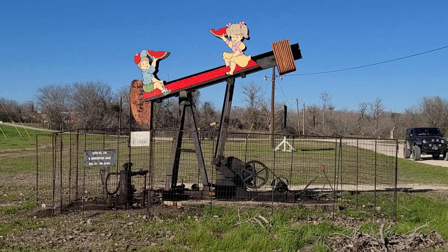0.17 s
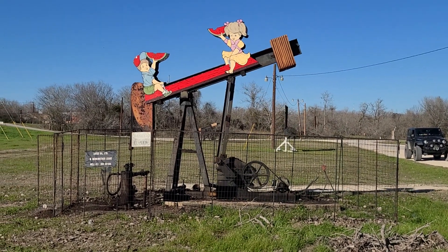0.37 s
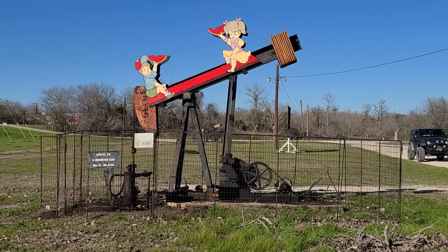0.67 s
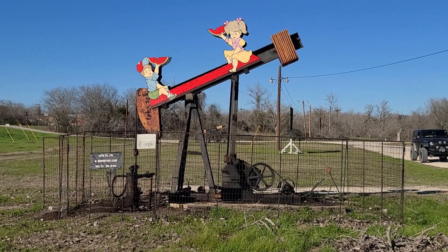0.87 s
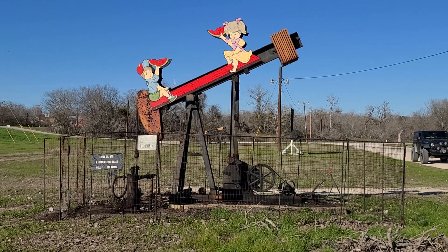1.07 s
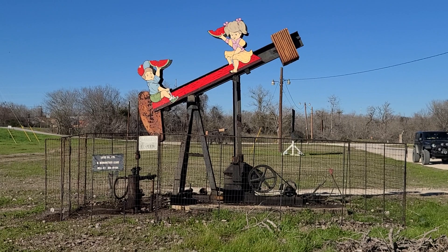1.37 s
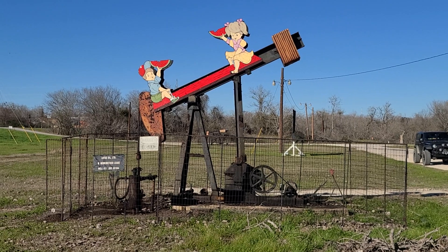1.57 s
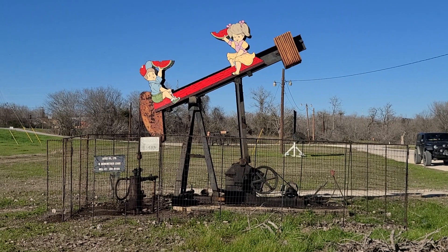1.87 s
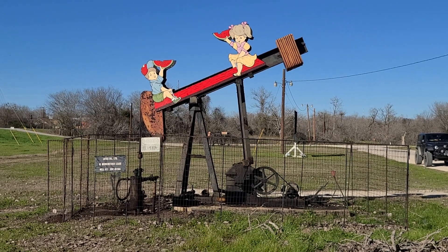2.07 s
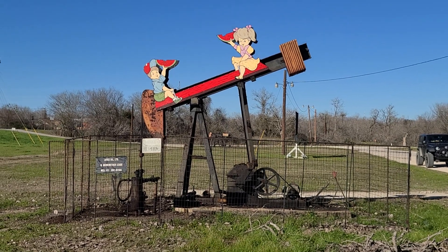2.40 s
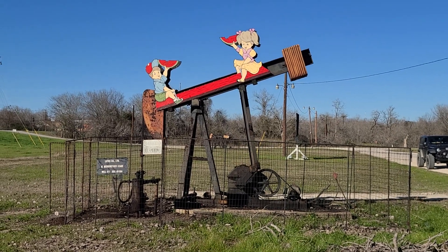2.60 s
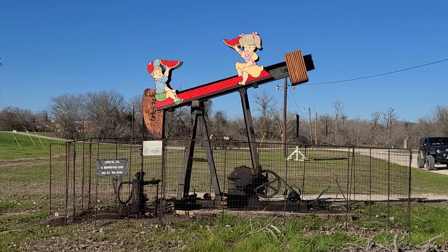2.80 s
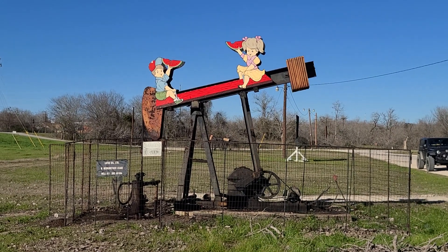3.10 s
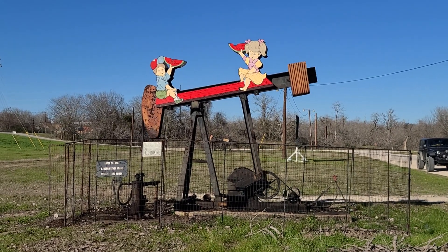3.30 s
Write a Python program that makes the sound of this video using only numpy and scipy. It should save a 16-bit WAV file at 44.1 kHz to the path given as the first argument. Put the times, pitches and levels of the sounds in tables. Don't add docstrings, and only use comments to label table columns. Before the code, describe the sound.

A car rolls away along a field road, tyres roaring and whining over low motor hum

```python
import sys
import numpy as np
from scipy import signal
from scipy.fft import rfft, irfft, next_fast_len
from scipy.io import wavfile
from scipy.ndimage import uniform_filter1d, map_coordinates

SR = 44100
rng = np.random.default_rng(int(sys.argv[2]) if len(sys.argv) > 2 else 0)


def convert_level_to_amplitude(level_db):
    exponent = np.asarray(level_db, float) / 20
    return 10 ** exponent


def pcm_store(signal):
    levels = np.round(np.clip(np.atleast_2d(signal), -1, 1) * 32767)
    wavfile.write(sys.argv[1], SR, levels.astype(np.int16).T)


N = 152145
T = np.arange(N) / SR


def unit(x):
    return x / np.sqrt(np.mean(x ** 2) + 1e-20)


def curves(rows):
    s, *columns = np.transpose(rows)
    return [np.interp(T, s, column) for column in columns]


def wobble(rate):
    knots = rng.standard_normal(int(N * rate / SR) + 4)
    return map_coordinates(knots, [T * rate])


def tone(hz, phase=0):
    return np.sin(2 * np.pi * np.cumsum(hz) / SR + phase)


def coloured(x, points):
    m = next_fast_len(N + 8192)
    f, db = np.transpose(points)
    bins = np.fft.rfftfreq(m, 1 / SR)
    gain = convert_level_to_amplitude(np.interp(np.log(bins + 1), np.log(f + 1), db, -120, -120))
    return irfft(rfft(x, m) * gain, m)[..., :N]


def rush(points, patchy_db):
    z = signal.stft(rng.standard_normal((3, N)), nperseg=512)[2]
    field = uniform_filter1d(rng.standard_normal(z.shape[1:]), size=6, axis=0)
    field = uniform_filter1d(field, size=12, axis=1)
    patchy = signal.istft(z * convert_level_to_amplitude(patchy_db * unit(field)), nperseg=512)[1]
    return unit(coloured(patchy[:, :N], points))


def band(hz, wide_hz):
    return [(hz - 2 * wide_hz, -22), (hz - wide_hz / 2, -3), (hz, 0), (hz + wide_hz / 2, -3), (hz + wide_hz, -22)]


def sides(pan_db):
    return convert_level_to_amplitude(np.array([np.ones(1) * pan_db / 2, np.ones(1) * -pan_db / 2]))


def ports(three, alike, lead, pan_db):
    alike = np.clip(alike, 0, 1)
    shared = [map_coordinates(three[0], [np.arange(N) + side * lead / 2], mode="mirror") for side in (1, -1)]
    return (np.sqrt(alike) * np.array(shared) + np.sqrt(1 - alike) * three[1:]) * sides(pan_db)


# f/Hz, level/dB [per Hz]
ROAD = [(100, -9), (168, -10.5), (328, -11.5), (430, -8.5), (900, -14.5), (1200, -8), (1520, -15.5),
        (1900, -14.5), (2500, -34.5), (4000, -33)]
# f/Hz, level/dB [per Hz]
RUMBLE = [(20, -22), (30, -13.5), (44, 3), (64, -0.5), (87, -2), (113, -5.5), (150, -14), (240, -29.5)]
# t/s, level/dB
ENGINES = [
    (0, -40.5),
    (1.2, -39),
    (1.9, -43),
    (2.4, -34),
    (3.45, -38),
]


def traffic():
    road_level = convert_level_to_amplitude(-43.5 + 0.46 * wobble(3.8))
    road = road_level * ports(rush(ROAD, patchy_db=1.5), alike=0.85, lead=4.56, pan_db=0)
    engine_level = convert_level_to_amplitude(curves(ENGINES)[0] - 1.0)
    return road + engine_level * ports(rush(RUMBLE, patchy_db=3), alike=0.86, lead=3, pan_db=-9.5)


# f/Hz, level/dB [per Hz]
GRASS = [(2800, -9), (3300, -10.5), (3800, -6), (4700, -2.5), (5500, -10.5), (6700, -5), (7400, -15),
         (9000, -5.5), (9950, -6.5), (10700, -44)]


def grass():
    hiss = convert_level_to_amplitude(-60.5 + 0.7 * wobble(6.24)) * ports(rush(GRASS, patchy_db=1.74), alike=0.53, lead=7.5, pan_db=-3.5)
    air_db, air_hz = -77, 11600
    air = rush([(air_hz - 1300, -22), (air_hz, 0), (16000, -1.4)], patchy_db=3)[1:]
    return hiss + convert_level_to_amplitude(air_db) * air


# f/Hz, width/Hz, level/dB, left-right/dB, stroke rate/Hz, duty [0-1]
INSECTS = [
    (8590, 87.4, -74.5, 20.5, 60.4, 0.61),
    (9506, 400, -75.5, -17.5, 60.4, 0.55),
    (4245, 57, -73, 8.5, 16, .45),
]
CLEAR = [.8, .35, .3]


def insects():
    out = np.zeros((2, N))
    drift = 0.29 * wobble(3.6) + 0.84 * (T > 2.6)
    for (hz, wide, db, pan_db, rate, duty), clear in zip(INSECTS, CLEAR):
        turn = np.cumsum(rate + drift) / SR
        stroke = (np.cos(2 * np.pi * turn) - np.cos(np.pi * duty)) * 3.2
        gate = 0.07 + np.clip(stroke, 0, 1)
        fresh = rng.standard_normal((int(turn[-1]) + 2, 2))
        detune, phase = fresh[np.round(turn).astype(int)].T
        pure = np.sqrt(2) * tone(hz + wide / 2 * detune, 2 * phase)
        rasp = rush(band(hz, wide), patchy_db=1.2)
        buzz = unit(gate * (np.sqrt(clear) * pure + np.sqrt(1 - clear) * rasp))
        out += convert_level_to_amplitude(db + wobble(4.4)) * ports(buzz, alike=0.73, lead=8.56, pan_db=pan_db)
    return out


# f/Hz, level/dB, wander/Hz
HUM = [
    (109.14, -44, 0.93),
    (189.2, -62, 1.37),
    (66.94, -41, 3.03),
]


def motor():
    lines = [convert_level_to_amplitude(db + 1.5 + 0.3 * wobble(5.4)) * tone(hz + wander * wobble(3)) for hz, db, wander in HUM]
    return sum(lines) * sides(2.9)


# t/s, level/dB, left-right/dB, length/s
GUSTS = [
    (.95, -43, 8, .05),
    (1.6, -39, 0, .03),
    (2.33, -39, -10, .07),
    (3.43, -41, -8, .03),
]
# f/Hz, level/dB [per Hz]
BUFFET = [(25, -14), (70, 0), (120, -8), (300, -26)]


def wind():
    puffs = sum(convert_level_to_amplitude(db) * sides(pan_db) * np.exp(-((T - s) / span) ** 2) for s, db, pan_db, span in GUSTS)
    return puffs * rush(BUFFET, patchy_db=0.0)[1:]


# f/Hz, level/dB [per Hz]
CRACK = [(200, -8), (500, 0), (1950, -2), (2300, -15), (3800, -22), (5000, -34), (7500, -42)]


def struck(hits, modes, crack_db):
    damped_db = -7
    rough_db, rough_rad, rise_cycles = 2, .35, 1.8
    out = np.zeros((2, N))
    for s, db, pan_db in hits:
        t = np.clip(T - s, 0, None)
        onset = 1 - np.exp(-t / .002)
        ring = 0
        for hz, mode_db, t60 in modes:
            decay = convert_level_to_amplitude(mode_db + rough_db * wobble(25.23) - 60 * t / t60)
            rise = 1 - np.exp(-t * hz / rise_cycles)
            ring = ring + decay * rise * np.sin(2 * np.pi * hz * t + rough_rad * wobble(30))
        crack = ports(unit(coloured(rng.standard_normal((3, N)), CRACK)), alike=0.11, lead=0, pan_db=0)
        blow = ring + convert_level_to_amplitude(crack_db - 60 * t / 0.11) * crack
        out = out * convert_level_to_amplitude(damped_db * onset) + convert_level_to_amplitude(db) * onset * blow * sides(pan_db)
    return out


# t/s, level/dB, left-right/dB
BAR_HITS = [
    (3.011, -27, -2),
    (3.125, -43, -2),
    (3.197, -40, -2),
]
# f/Hz, level/dB, t60/s
BAR = [(330, -9, .05), (215, -11, .15), (440, -10, 0.45), (500, -12, .3), (557, -11, 0.6), (640, -5, .09),
       (800, -2, .08), (2320, -18, .12), (3380, -18, 0.05)]
# f/Hz, level/dB, t60/s
BAR_TOP = [(1292, -2, .12), (1235, -13, .3)]
# t/s, level/dB, left-right/dB
PAIR_HITS = [
    (3.016, -26.5, -2),
    (3.128, -43, -2),
    (3.198, -36.5, -2),
    (3.262, -56, -2),
]
# f/Hz, level/dB, t60/s
BAR_PAIR = [(345, 0, .75), (368.5, -2.5, 1.0)]
# t/s, level/dB, left-right/dB
PLATE_HITS = [
    (1.572, -30, -1),
    (1.578, -29.5, -1),
]
# t/s, level/dB, left-right/dB
BOUNCE_HITS = [
    (3.119, -33.5, -2),
    (3.128, -34, -2),
]
# f/Hz, level/dB, t60/s
PLATE = [(225, -5, .12), (660, -8, .12), (800, -8, .1), (1090, -1, .07), (1290, -4, .07), (1880, -3, .06)]
# t/s, level/dB, left-right/dB
THUDS = [
    (1.415, -33, -1),
    (1.443, -33, 0),
    (1.476, -38, 0),
    (1.592, -33.5, 1),
    (1.612, -36, 1),
    (1.652, -40, 0),
]
# f/Hz, level/dB, t60/s
THUD = [(390, -8, .15), (490, -2, .14), (560, -1, .16), (650, -3, .14), (740, -3, .12)]
# f/Hz, level/dB
CHIP = [(2780, 0), (3150, -12)]


def knocks():
    out = struck(PAIR_HITS, BAR_PAIR, crack_db=-30)
    out += struck(BAR_HITS, BAR, crack_db=-2)
    out += struck(BAR_HITS[:1], BAR_TOP, crack_db=-12)
    out += struck(PLATE_HITS + BOUNCE_HITS, PLATE, crack_db=-2)
    out += struck(THUDS, THUD, crack_db=-10)
    tick_s, rise_s, tick_db = 2.5968, .0011, -29
    t = np.clip(T - tick_s, 0, None)
    pulse = t / rise_s * np.exp(-t / rise_s)
    return out + pulse * sum(convert_level_to_amplitude(tick_db + db) * np.sin(2 * np.pi * hz * t) for hz, db in CHIP)


# t/s, level/dB, left port's lead [samples]
CAR = [
    (0, -37.5, 17.5),
    (.5, -39, 17.3),
    (1.4, -39, 15.5),
    (2.05, -42, 13.6),
    (3.45, -45, 14),
]
# f/Hz, level/dB [per Hz]
TYRES = [(200, -28), (409, -20.5), (683, -8), (995, -9.5), (1330, -6), (1560, -10.5), (1900, -12.5),
         (3050, -34), (4200, -56.5)]
# t/s, level/dB, f/Hz
TREAD = [(0, -40, 828.5), (.1, -55, 830), (.17, -40, 826), (.24, -50, 835), (.31, -37.5, 846),
         (.35, -52, 836), (.4, -37, 812), (.47, -46.5, 821.4), (.62, -46.5, 819.5), (.68, -50.5, 812),
         (.75, -41, 808), (.82, -47.5, 812), (.94, -41.5, 812), (1.02, -48, 806), (1.2, -48.5, 813.6),
         (1.28, -39, 804), (1.37, -43, 812), (1.45, -42.5, 798), (1.52, -59, 796.5), (3.45, -71, 795)]
# f/Hz, level/dB [per Hz]
BODY = [(280, -15), (380, -0.5), (480, -8), (600, -6), (760, -1), (900, -23)]


def car():
    level_db, lead = curves(CAR)
    fade_db = level_db[0] + 3.5 + 1.84 * (level_db - level_db[0]) + 0.81 * wobble(7.6)
    roar = convert_level_to_amplitude(fade_db) * rush(TYRES, patchy_db=0.5)

    whine_db, whine_hz = curves(TREAD)
    line = tone(whine_hz + 10 * wobble(45)) * convert_level_to_amplitude(2 * wobble(30))
    whine = convert_level_to_amplitude(whine_db) * (1.05 * line + .6 * rush(band(815, wide_hz=45), patchy_db=1))

    engine_hz, engine_db, fade_db_per_s = 57, -38, 3
    note = convert_level_to_amplitude(engine_db - fade_db_per_s * T + 2.3 * wobble(8.6)) * tone(engine_hz + 2.565 * wobble(3.5))

    body_db, gone_s, fade_s = -45, .6, .04
    boom = convert_level_to_amplitude(body_db) * rush(BODY, patchy_db=-2.5) * (1 - np.tanh((T - gone_s) / fade_s)) / 2
    return ports(roar + whine + note + boom, alike=0.76, lead=lead, pan_db=0.88)


def scene():
    return traffic() + grass() + insects() + motor() + wind() + knocks() + car()


def band_limit(x):
    return signal.sosfilt(signal.butter(12, 15720, fs=SR, output="sos"), x)


def record(dry):
    return band_limit(dry)


dry = scene()
out = record(dry)
pcm_store(out)
```